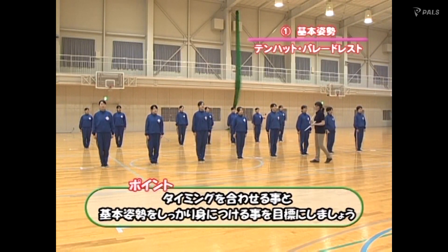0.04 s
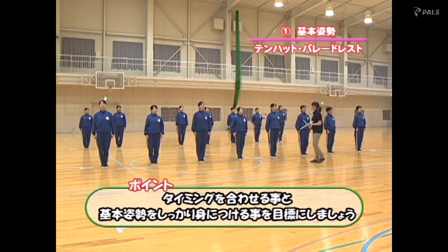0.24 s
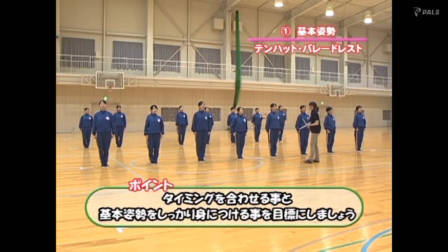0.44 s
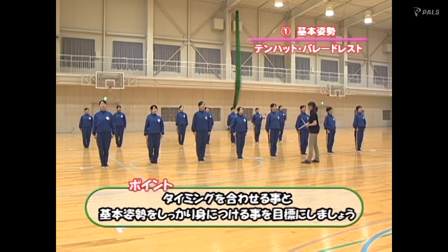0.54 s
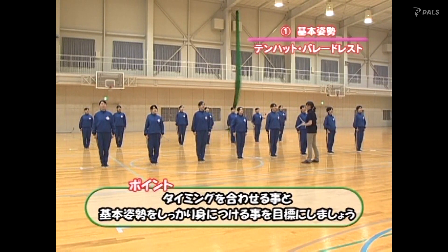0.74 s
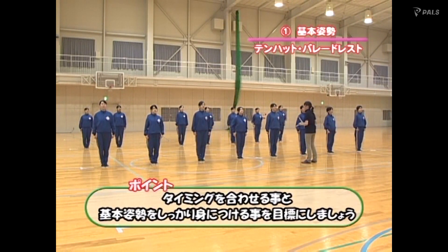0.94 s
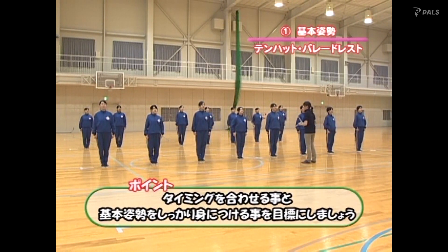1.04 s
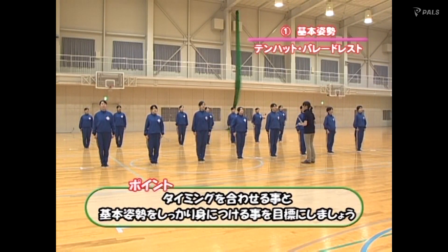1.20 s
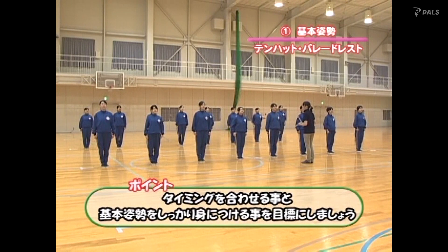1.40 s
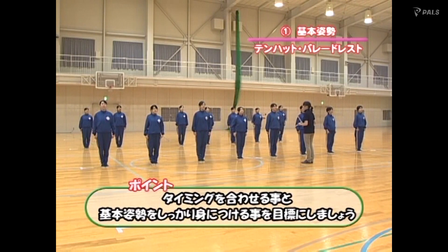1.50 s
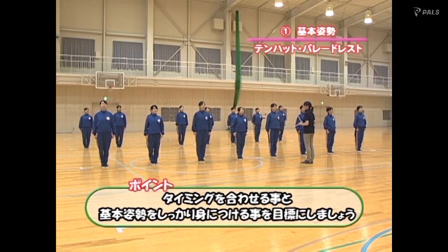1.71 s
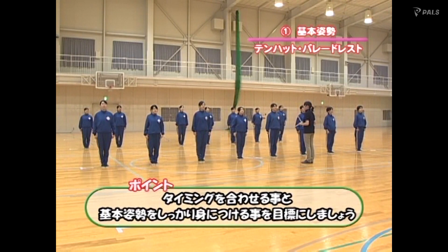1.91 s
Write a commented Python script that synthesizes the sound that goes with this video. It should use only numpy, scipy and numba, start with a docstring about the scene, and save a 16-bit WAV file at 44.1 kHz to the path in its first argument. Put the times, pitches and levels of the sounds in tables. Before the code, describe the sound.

One sharp wooden stick clack rings through a large gym over faint shoe taps.

```python
"""A faint ring fades over the rumble of a large gym; then one sharp, woody clack, close to the
microphone, most likely a pair of sticks beating time for a drill. The floor mirrors it, the far walls
answer with a long ring, and shoes tap faintly on the boards before and after.
The recorder's gain control ducks at the clack and lets the room tone swell back."""
import sys
import numpy as np
from scipy import signal
from scipy.fft import rfft, irfft
from scipy.io import wavfile
from scipy.ndimage import minimum_filter1d
from numba import njit

SR = 44100
rng = np.random.default_rng(int(sys.argv[2]) if len(sys.argv) > 2 else 0)


def int16_out(signal):
    """Quantize to a 16-bit WAV file."""
    q = np.round(np.clip(np.atleast_2d(signal).T, -1, 1) * 32767)
    wavfile.write(sys.argv[1], SR, q.astype(np.int16))


N = 85995
TIME, FREQS = np.arange(N) / SR, np.arange(N // 2 + 1) * SR / N
CLACK_S, WOOD_RISE_S, CONTACT_RISE_S = .2151, .0023, .00115


def undb(db):
    """Decibels to gain."""
    return 10 ** (np.asarray(db) / 20)


def on_log(hz, points):
    """Read a table of (f/Hz, value) on a log-frequency axis."""
    p = np.array(points)
    return np.interp(np.log(np.maximum(hz, 1)), np.log(p[:, 0]), p[:, 1])


def noise(gain):
    """Noise of rms 1, its spectrum shaped by a gain for each of FREQS."""
    x = irfft(rfft(rng.standard_normal(N)) * gain, N)
    return x / np.sqrt(np.mean(x ** 2))


def band(hz, width):
    """Noise in one resonance with soft skirts."""
    detuning = (FREQS ** 2 - hz ** 2) / (np.maximum(FREQS, 1) * width)
    return noise(1 / (1 + detuning ** 2 / 2))


def fade(start, t60, rise=1 / SR):
    """Envelope: a straight rise into an exponential decay."""
    age = np.maximum(TIME - start, 0)
    return np.minimum(age / rise, 1) * np.exp(-np.log(1000) * age / t60)


def late(x, seconds):
    """Delay a signal."""
    return np.r_[np.zeros(int(seconds * SR)), x][:N]


# Room tone all around the microphone: f/Hz, relative spectral level/dB
RUMBLE_SPECTRUM = [(25, -24.5), (45, -19.5), (80, -10.5), (130, 0.5), (165, -1), (270, -13.5), (480, -16),
                   (650, -23), (1200, -31.5), (2500, -34.5), (6000, -36.5), (14000, -40)]
def room_tone(level_db=-60, wander_db=.8, wander_hz=5):
    """The gym's low rumble, wandering a little in level."""
    wander = noise(np.exp(-(FREQS / wander_hz) ** 2))
    return undb(level_db + wander_db * wander) * noise(undb(on_log(FREQS, RUMBLE_SPECTRUM)))


# Ring already hanging in the hall: f/Hz, width/Hz, level/dB
LINGER_BANDS = [(810, 90, -57), (1150, 72, -61), (1655, 130, -60), (2030, 110, -65), (2660, 110, -58.5),
                (3294, 700, -60), (3630, 150, -66.5), (4300, 430, -70.5)]
def lingering_ring():
    """Bands of reverberation from before the clack, dying away together."""
    return sum(undb(db) * band(hz, width) for hz, width, db in LINGER_BANDS) * fade(0, t60=1.8)


# Far from the microphone: t/s, level/dB, f/Hz, width/Hz, rise/s, t60/s
FAR_SOUNDS = [(.115, -56, 160, 60, .025, .3), (1.12, -73, 1510, 55, .03, 1.6),
              (1.138, -72, 3700, 1300, .01, 1.7), (1.12, -70, 1500, 1900, .11, 1.4),
              (1.1, -81, 11000, 5000, .11, 1.2), (1.58, -60.5, 135, 70, .26, 4),
              (1.66, -71, 525, 50, .07, .8)]
def far_sounds():
    """Faint tones, rustles and swells that hang in the hall."""
    return sum(undb(db) * band(hz, width) * fade(start, t60, rise)
               for start, db, hz, width, rise, t60 in FAR_SOUNDS)


# Shoes out on the gym floor: t/s, level before dulling/dB, f/Hz, width/Hz, t60/s
SHOE_TAPS = [(0.126, -55, 1126, 119, 0.14), (.165, -51, 376.8, 243.8, .06), (0.425, -36.5, 800, 805, 0.017),
             (0.604, -36, 1170, 1700, 0.014), (1.1056, -51, 760, 336, 0.031)]
def shoe_taps(top_hz=2800):
    """Soles meet the boards in short, dull bursts of noise."""
    taps = sum(undb(db) * band(hz, width) * fade(start, t60, CONTACT_RISE_S)
               for start, db, hz, width, t60 in SHOE_TAPS)
    return signal.sosfilt(signal.butter(4, top_hz, fs=SR, output="sos"), taps)


# Ring time of the gym: f/Hz, t60/s
RING_TIMES = [(200, 1.5), (1000, 1.6), (2000, 2.1), (3600, 2.1), (5000, 1.9), (8000, 0.63), (14000, 1.2)]
def hall_tail(lull_s=.047, rise_s=.012, lull_db=-14.5, flutter_db=.34, flutter_hz=35):
    """The hall's diffuse response, of energy 1: a short lull, then a ring whose treble dies first."""
    white = rfft(rng.standard_normal(N))
    centres = np.geomspace(200, 14000, 13)
    tail = np.zeros(N)
    for hz, share in zip(centres, np.eye(len(centres))):
        one_band = irfft(white * on_log(FREQS, np.c_[centres, share]), N)
        tail += one_band * fade(0, on_log(hz, RING_TIMES))
    tail *= np.clip((TIME - lull_s) / rise_s, undb(lull_db), 1)
    tail *= undb(flutter_db * noise(np.exp(-(FREQS / flutter_hz) ** 2)))  # late reflections come unevenly
    return tail / np.linalg.norm(tail)


# Echoes from the far walls: t/s after the blow, level/dB relative to the sound sent out
WALL_ECHOES = [(.06, -40), (0.076, -43.5), (0.13, -40.5), (0.174, -51)]
def hall(sent, tail_db=-32.5, floor_db=-33.5, floor_s=.0265):
    """What returns to the microphone: the floor's mirror image, smeared wall echoes, the long ring."""
    response = undb(tail_db) * hall_tail()
    for delay, db in WALL_ECHOES:
        smear = rng.standard_normal(N) * fade(delay, t60=.016)
        response += undb(db) * smear / np.linalg.norm(smear)
    return signal.fftconvolve(sent, response)[:N] + undb(floor_db) * late(sent, floor_s)


def thump(from_hz=650, to_hz=50, glide_s=.0037):
    """The dull low thump of the blow, gliding quickly down in pitch."""
    pitch = to_hz + (from_hz - to_hz) * np.exp(-TIME / glide_s)
    return -np.sin(2 * np.pi * np.cumsum(pitch) / SR) * fade(0, t60=.034, rise=.0032)


# The crack at the microphone, and as it spreads into the hall: f/Hz, relative spectral level/dB
CRACK_NEAR = [(100, -14.5), (550, -12), (800, 5.5), (1400, 2.5), (2300, -8), (3300, -1), (5500, -4.5),
              (8000, -9.5), (10000, -16), (13500, -19.5), (15500, -24)]
CRACK_SENT = [(200, -20.5), (600, -9), (950, -9), (1400, -6.5), (2200, -0.5), (3300, 6.5), (4300, -4),
              (5200, -1.5), (6200, -10), (8500, -16.5), (11000, -23.5), (15000, -36)]
def crack(colour, t60=.02):
    """Wood meets wood: a brief burst with random phases and an even spectrum of the given colour."""
    envelope = fade(0, t60, CONTACT_RISE_S)
    spectrum = rfft(rng.standard_normal(N) * envelope)
    phases = spectrum / np.abs(spectrum)
    burst = irfft(undb(on_log(FREQS, colour)) * phases, N) * fade(0, 2 * t60)
    return burst * np.linalg.norm(envelope) / np.linalg.norm(burst)


# Modes of the wood, close up: f/Hz, relative level at the microphone/dB, t60/s, into the hall/dB
WOOD_MODES = [(955, -31, .043, -22.5), (1081.5, -22, 0.053, -28), (1703.4, -26, .041, -24.5),
              (1998, -12, 0.034, -18), (2599, -23, .025, -28), (2986, -8, 0.022, -13),
              (3340, -15, 0.011, -18.5), (3634, -8.5, .022, -9.5), (4070, -19, 0.018, -25),
              (4835, -25.5, 0.026, -20), (5232, -14, .013, -18.5), (6493, -29, .014, -34.5),
              (6950, -37.5, 0.017, -31.5)]
def clack():
    """Struck wood cracks, thumps and rings; returns the close sound and the sound sent into the hall."""
    near = undb(-21) * crack(CRACK_NEAR) + undb(-25.5) * thump()
    sent = undb(-11.5) * crack(CRACK_SENT)
    for k, (hz, near_db, t60, sent_db) in enumerate(WOOD_MODES):
        swing = (-1) ** k * np.sin(2 * np.pi * hz * TIME)  # neighbouring modes swing opposite ways
        ring = swing * fade(0, t60, WOOD_RISE_S)
        near += undb(near_db) * ring
        sent += undb(sent_db) * ring
    return near, sent


def scene(clack_db=18.5, balance_db=-.25):
    """The clack close by, the gym behind it, almost the same in both channels."""
    near, sent = clack()
    background = room_tone() + lingering_ring() + far_sounds() + shoe_taps()
    mid = background + undb(clack_db) * late(near + hall(sent), CLACK_S)
    # a faint stereo width on the clack, the ring and the rumble
    side_clack = undb(clack_db) * late(hall(sent) + undb(-21) * crack(CRACK_NEAR), CLACK_S)
    side_ring = lingering_ring()
    side = undb(-37.5) * (side_clack + side_ring) + undb(-26) * room_tone()
    return np.array([(mid + side) * undb(balance_db / 2), (mid - side) * undb(-balance_db / 2)])


@njit
def duck(excess_db, start_db, attack_s, release_s):
    """Gain reduction in dB: chases any excess quickly and lets go slowly."""
    out, reduction = np.empty(len(excess_db)), start_db
    for i, excess in enumerate(excess_db):
        lag_s = attack_s if excess > reduction else release_s
        reduction += (excess - reduction) / (lag_s * SR)
        out[i] = reduction
    return out


def record(dry, low_cut_hz=50, ceiling_db=-4.5, lookahead_s=.004, hiss_db=-81.5, top_hz=14400):
    """Behind the microphone: low cut, look-ahead gain control, preamplifier hiss, steep top cut."""
    dry = signal.sosfilt(signal.butter(2, low_cut_hz, "high", fs=SR, output="sos"), dry)
    peak_db = 20 * np.log10(np.abs(dry).max(axis=0) + 1e-9)
    excess_db = np.maximum(peak_db - ceiling_db, 0)
    excess_db = -minimum_filter1d(-excess_db, 2 * int(lookahead_s * SR) + 1)  # largest excess nearby
    held = dry * undb(-duck(excess_db, start_db=6., attack_s=.0003, release_s=.55))
    hiss = undb(hiss_db) * rng.standard_normal(N)
    return signal.sosfilt(signal.ellip(8, .2, 70, top_hz, fs=SR, output="sos"), held + hiss)


dry = scene()
out = record(dry)
int16_out(out)
```